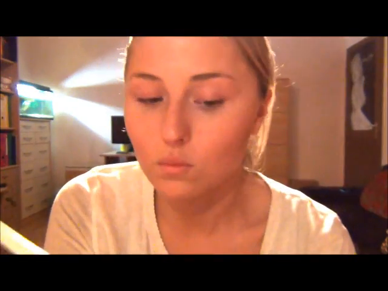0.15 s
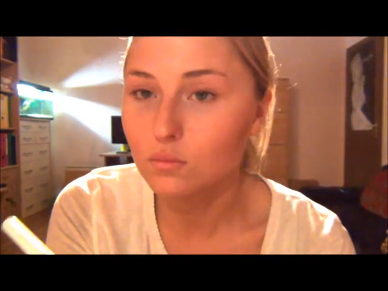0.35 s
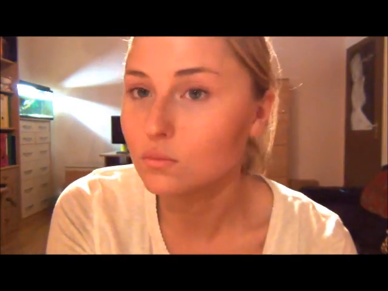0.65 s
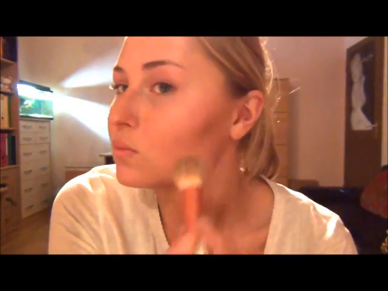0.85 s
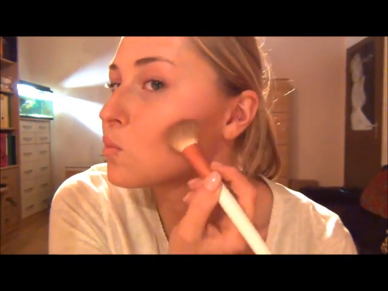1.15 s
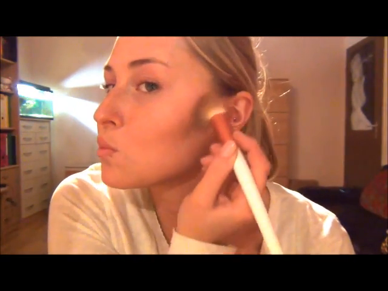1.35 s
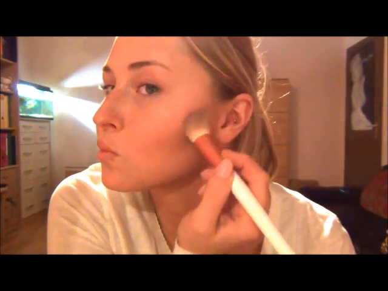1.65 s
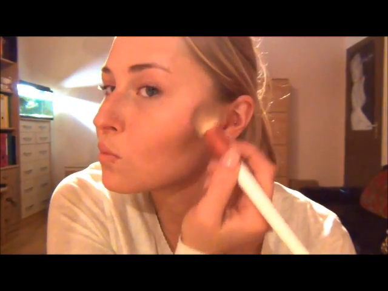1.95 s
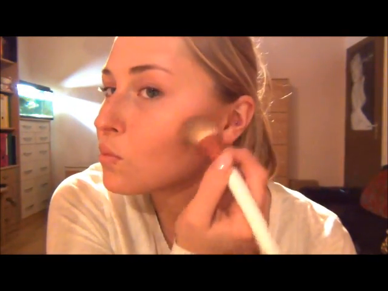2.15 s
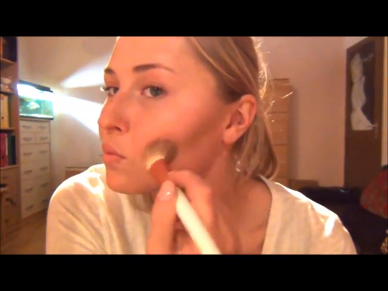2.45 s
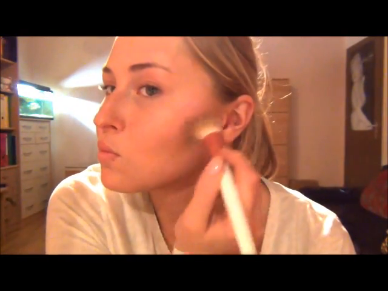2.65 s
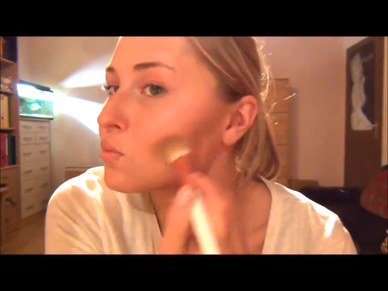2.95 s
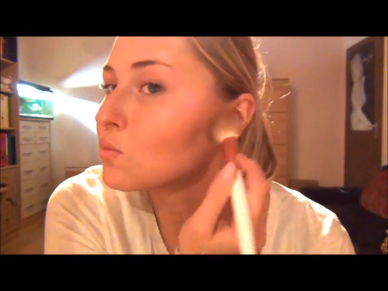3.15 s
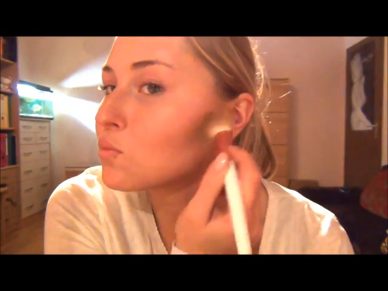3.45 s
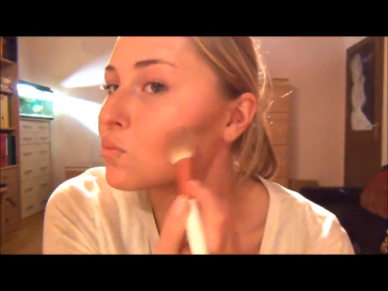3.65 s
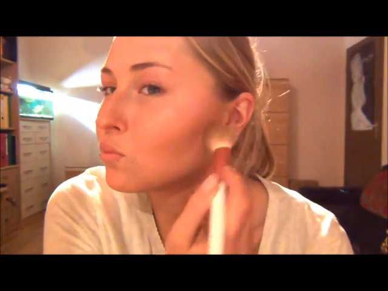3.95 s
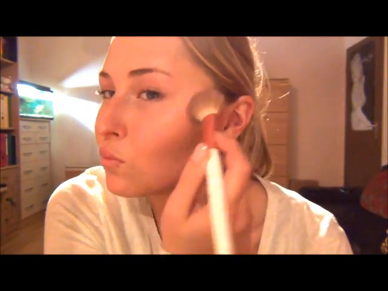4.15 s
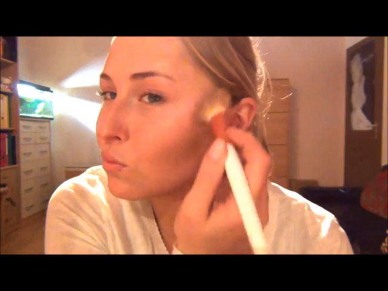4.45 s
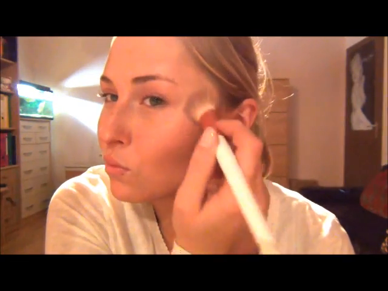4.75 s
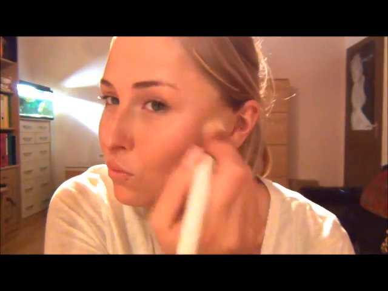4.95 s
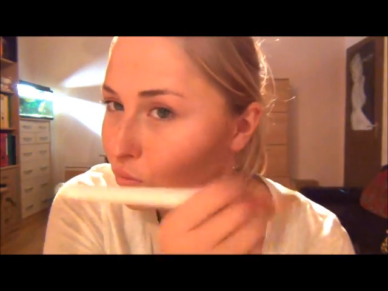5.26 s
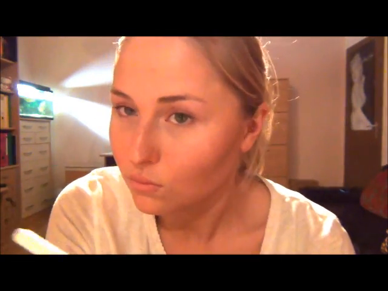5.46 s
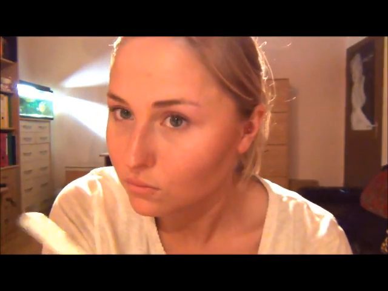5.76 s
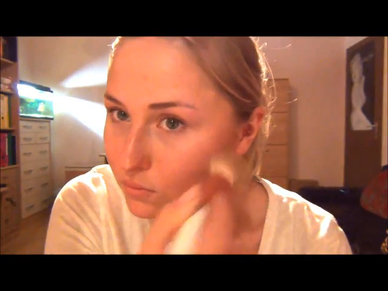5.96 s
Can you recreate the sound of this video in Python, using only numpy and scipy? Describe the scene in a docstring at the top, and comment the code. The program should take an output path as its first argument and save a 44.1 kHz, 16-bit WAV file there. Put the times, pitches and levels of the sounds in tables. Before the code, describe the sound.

A faint computer fan, mains hum and hiss run throughout in a bedroom. Close to the microphone, a makeup brush scrapes in powder at about 0.4, 0.6 and 0.8 seconds, each dab louder, the third with tiny dry ticks and a thin ring from the pan. At 1 second the plastic compact snaps shut, sharp and bright, with a short room echo. This is by far the loudest sound; the background dips after it and creeps back over about three seconds. From 1.4 to 5.5 seconds, slightly farther away, the brush sweeps to and fro over a cheek in soft, airy, uneven strokes, about four a second. At 5.6 seconds bristles tick against the pan's rim, and two close, lightly ringing scrapes follow at 5.7 and 5.9 seconds. One last very faint sweep comes at 6 seconds.

```python
"""A powder brush and its plastic compact, close to a small microphone in a bedroom.
The bristles scrape the powder and set the pan ringing, then the lid snaps shut. A little farther off
the brush sweeps to and fro over a cheek, and at the end it is loaded once more, close up.
A computer fan and mains hum sit behind it. The snap ducks the recorder's automatic gain,
which creeps back over a few seconds."""
import sys
import numpy as np
from scipy import signal
from scipy.fft import rfft, irfft, next_fast_len
from scipy.io import wavfile
from scipy.ndimage import uniform_filter1d

SR = 44100
rng = np.random.default_rng(int(sys.argv[2]) if len(sys.argv) > 2 else 0)


def file_out(sig):
    """Save sig as 16-bit WAV at sys.argv[1]."""
    # one column per channel
    cols = np.atleast_2d(sig).T
    # limit, then scale
    lim = np.clip(cols, -1, 1)
    pcm = np.round(lim * 32767).astype(np.int16)
    wavfile.write(sys.argv[1], SR, pcm)


N = 268549
TIME = np.arange(N) / SR

# spectra of the fan's air and the microphone's own hiss: f/Hz, relative density/dB
FAN_AIR_SPECTRUM = [(20, -20), (35, -7.5), (70, -8), (150, -6), (200, -1.5), (290, -0.5), (370, -4.5),
                    (500, -8), (750, -5.5), (1020, -8.5), (1500, -10.5), (2100, -12), (3500, -21.5),
                    (8000, -24)]
MIC_HISS_SPECTRUM = [(300, -13), (3000, 1.5), (7000, -1), (11000, .5), (15000, -1.5), (16000, -6.5)]
# resonances of the fan and its housing: f/Hz, width/Hz, level/dB
FAN_RESONANCES = [(200.2, 3.6, -64.5), (224.2, 3.7, -63), (254, 10.5, -62.5), (300, 33, -69),
                  (587, 28, -69), (635, 3.3, -72.5), (824.7, 25, -65), (866, 28, -62), (908.4, 19, -63.5),
                  (1253, 73, -66), (1656, 8.1, -73)]
# mains hum and a thin whine with mains sidebands: f/Hz, level/dB
ELECTRICAL_TONES = [(50, -81), (100, -66.5), (15575, -80), (15625, -69.5), (15675, -75)]
# likeness of the background in left and right: f/Hz, correlation
STEREO_CORRELATION = [(60, 0.99), (250, 0.99), (640, 0.79), (1400, 0.67), (3000, 0.44), (7000, 0.68),
                      (15000, 0.86)]
# spectra coming back off the walls, from the brush and from the snap: f/Hz, relative density/dB
BRUSH_ROOM_SPECTRUM = [(100, -10), (500, -1), (2700, 9), (6000, 4), (10000, -2), (15000, -5)]
SNAP_ROOM_SPECTRUM = [(200, -34), (1000, -6), (1900, -3.5), (2700, 2), (3400, -3.5), (4100, 0), (5000, -1),
                      (6100, -6.5), (7000, 2), (7600, 0.5), (8400, -4), (10500, -2.5), (12600, -12),
                      (14000, -16)]
# heavily damped modes of the plastic case: f/Hz, level/dB, t60/s
COMPACT_MODES = [(640, -26, 0.0046), (1370, -26.5, 0.014), (2220, -21, 0.011), (2970, -15, 0.0058),
                 (4090, -17.5, 0.0095), (5040, -18.5, 0.017), (5570, -15.5, 0.0073), (6940, -10, 0.0068),
                 (7580, -13.5, 0.0097), (8530, -16, 0.0092), (9400, -19.5, 0.017), (10600, -21, 0.0067),
                 (11700, -23, 0.0077), (12400, -22.5, 0.018), (14750, -23, 0.0067)]
# the lid shuts and rebounds: t/s, relative level/dB
LID_CONTACTS = [(.9739, 2), (.9861, -1), (.9922, -6.5)]
# stiff bristles flick off the rim of the pan: t/s, relative level/dB
RIM_FLICKS = [(.7562, -19), (.7602, -20), (5.6416, -10.5), (5.6693, -20), (5.6758, -18), (5.6795, -26),
              (5.8853, -26), (5.9046, -19.5)]
# dabs into the compact: deepest point t/s, travel since landing/s, time on the bare pan/s,
# scrape level/dB, relative ring level/dB
POWDER_DABS = [(.38, .035, 0.022, -55, -53), (.577, .074, 0.024, -48, -41),
               (0.759, 0.077, 0.011, -43.5, -27.5), (5.68, 0.088, 0.037, -41.5, -34.5),
               (5.899, 0.082, 0.018, -44.5, -36.5)]
# spectrum of bristles scraping powder: f/Hz, relative density/dB
SCRAPE_SPECTRUM = [(400, -15), (1700, -4.5), (3200, -6), (4400, -4), (5100, 1), (6000, -2), (7000, 0.5),
                   (9000, 0), (10600, 0), (12500, -2.5), (14000, -8), (16000, -2)]
# thin ringing of the powder pan: f/Hz, width/Hz, relative level/dB
PAN_RESONANCES = [(2400, 440, -15), (4860, 87, -5), (7000, 410, -14), (8700, 250, -6), (10470, 330, -2.5),
                  (11900, 4800, -7), (12430, 210, -1), (14400, 300, -3)]
# sweeps over the cheek: top speed t/s, length/s, level/dB, pressure as rub over hiss/dB
CHEEK_SWEEPS = [(1.383, 0.076, -55.5, -4), (1.494, 0.097, -54, -.5), (1.706, .075, -56.5, -6.5),
                (1.893, .06, -55.5, -4.5), (2.096, 0.11, -57, -6), (2.298, 0.045, -56.5, -6.5),
                (2.436, 0.066, -50, -7), (2.705, .09, -59.5, -6.5), (2.8, 0.053, -55.5, -4.5),
                (2.94, 0.068, -57, -7), (3.178, 0.13, -56.5, -4.5), (3.539, 0.076, -52.5, -0.5),
                (3.927, 0.071, -54.5, 1), (4.358, 0.045, -52, -7.5), (4.649, 0.044, -51.5, -8),
                (4.94, 0.053, -54.5, -6), (5.252, .046, -51.5, -4.5), (5.492, 0.078, -52, -12),
                (6.037, 0.048, -60.5, -3)]
# spectra of the hair tips and of the body of the brush on skin: f/Hz, relative density/dB
TIP_SPECTRUM = [(2500, -28), (7000, -11), (8500, -8), (10000, -0.5), (11500, 1.5), (12700, -2.5),
                (14000, -7), (16000, -11.5)]
RUB_SPECTRUM = [(500, -19), (1300, -7.5), (2000, -5.5), (2600, -11), (3300, -0.5), (4400, -2), (5300, -8.5),
                (6300, -4.5), (7600, -20), (12000, -38)]


def from_db(db):
    """Decibels to gain."""
    return 10 ** (np.asarray(db) / 20)


def unit_rms(x):
    """Scale to rms 1."""
    return x / np.sqrt(np.mean(x ** 2) + 1e-20)


def at_hz(points, hz):
    """Read a table on a log-frequency axis."""
    table_hz, values = np.array(points).T
    return np.interp(np.log(np.maximum(hz, 1)), np.log(table_hz), values)


def coloured(x, spectrum):
    """Give a noise a spectrum, at rms 1."""
    size = next_fast_len(x.shape[-1])
    gain = from_db(at_hz(spectrum, np.fft.rfftfreq(size, 1 / SR)))
    return unit_rms(irfft(rfft(x, size) * gain, size)[..., :x.shape[-1]])


def pole_pair(hz, width_hz):
    """Feedback coefficients of one damped resonance."""
    r = np.exp(-np.pi * width_hz / SR)
    return [1, -2 * r * np.cos(2 * np.pi * hz / SR), r * r]


def resonate(x, hz, width_hz):
    """Two-pole resonance with gain 1 at its peak."""
    poles = pole_pair(hz, width_hz)
    return signal.lfilter(np.array([1, 0, -1]) * (1 - poles[2]) / 2, poles, x)


def clicks(rows):
    """One impulse for each row of t/s, level/dB."""
    impulses = np.zeros(N)
    for s, level_db in rows:
        impulses[round(s * SR)] += from_db(level_db)
    return impulses + 1e-18


def panned(x, left_db, late_s=0.0):
    """Place a source at the microphone by the level and delay of left against right."""
    size = next_fast_len(N)
    delay = np.exp(-2j * np.pi * np.fft.rfftfreq(size, 1 / SR) * late_s)
    left = irfft(rfft(x, size) * delay, size)[:N]
    return np.array([left, x]) * from_db(np.array([[left_db], [-left_db]]) / 2)


def spread(pair):
    """Two unrelated noises become left and right: alike in the bass, less so higher up."""
    size = next_fast_len(N)
    alike = np.clip(at_hz(STEREO_CORRELATION, np.fft.rfftfreq(size, 1 / SR)), 0, 1)
    width = np.sqrt((1 - alike) / (1 + alike))
    mid, side = rfft(pair, size)
    return irfft(mid + width * side * [[1], [-1]], size)[:, :N]


def room_tone(air_db=-56.0, hiss_db=-58.5):
    """At the back, fan air excites its housing, over electrical tones and microphone hiss."""
    air = from_db(air_db) * coloured(rng.standard_normal((2, N)), FAN_AIR_SPECTRUM)
    turbulence = rng.standard_normal((2, N))
    housing = sum((-1) ** k * from_db(db) * unit_rms(resonate(turbulence, hz, width))
                  for k, (hz, width, db) in enumerate(FAN_RESONANCES))
    hiss = from_db(hiss_db) * coloured(rng.standard_normal((2, N)), MIC_HISS_SPECTRUM)
    tones = sum(np.sqrt(2) * from_db(db) * np.sin(2 * np.pi * (hz * TIME + rng.random()))
                for hz, db in ELECTRICAL_TONES)
    return spread(air + housing + hiss) + tones


def bedroom(x, wet_db, colour, t60=0.39, treble_t60=0.27, split_hz=8500, build_s=0.0017):
    """The walls return a short, dense reverberation, fairly narrow in stereo; its treble dies first."""
    t = TIME[:SR // 2]
    mid, side = coloured(rng.standard_normal((2, len(t))), colour)
    walls = mid + 0.46 * side * np.array([[1], [-1]])
    low, high = (signal.sosfilt(signal.butter(4, split_hz, kind, fs=SR, output="sos"), walls)
                 for kind in ("low", "high"))
    echo = low * 1000 ** (-t / t60) + high * 1000 ** (-t / treble_t60)
    echo *= 1 - np.exp(-t / build_s)
    echo /= np.sqrt(np.sum(echo ** 2) / 2)
    return from_db(wet_db) * signal.fftconvolve(x[None], echo, axes=1)[:, :N]


def plastic_case(force):
    """The struck compact rings briefly in its damped modes."""
    ring = np.zeros(N)
    for k, (hz, level_db, t60) in enumerate(COMPACT_MODES):
        r, w = from_db(-60 / (t60 * SR)), 2 * np.pi * hz / SR
        mode = signal.lfilter([0, np.sin(w)], [1, -2 * r * np.cos(w), r * r], force)
        ring += (-1) ** k * from_db(level_db) * mode
    return ring


def lid_snap(bend_hz=7000, bend_width_hz=4200):
    """Close up, bending waves in the plastic disperse and smear each contact over a millisecond as the case
    rings."""
    poles = pole_pair(bend_hz, bend_width_hz)
    force = clicks(LID_CONTACTS)
    for _ in range(3):
        force = signal.lfilter(poles[::-1], poles, force)   # all-pass
    return plastic_case(force)


def swell(s, rise_s, fall_s, level_db):
    """Brush speed rises smoothly to its top at time s and falls again."""
    from_top = (TIME - s) / np.where(TIME < s, rise_s, fall_s)
    return from_db(level_db) * np.exp(-np.minimum(from_top ** 2, 50) / 2)


def together(envelopes):
    """Overlapping strokes add in power."""
    return np.sqrt(sum(e ** 2 for e in envelopes))


def bristles(per_s, size_db):
    """Countless hairs catch and slip, each a tiny impulse; size_db scatters their sizes."""
    sizes = from_db(size_db * np.minimum(rng.exponential(1, N), 4))
    signs = rng.choice([-1, 1], N)
    slipping = rng.random(N) < per_s / SR
    return unit_rms(sizes * signs * slipping)


def rim_flicks(low_cut_hz=3200, tick_db=4.0):
    """A bristle released from the rim gives a bright, dry tick."""
    low_cut = signal.butter(2, low_cut_hz, "high", fs=SR, output="sos")
    return from_db(tick_db) * signal.sosfilt(low_cut, clicks(RIM_FLICKS))


def flutter(per_s, depth_db=2.5):
    """A gain that wavers at random, gliding to a new value per_s times a second."""
    knots = rng.standard_normal(N // 10)
    return from_db(depth_db * np.interp(TIME * per_s, np.arange(len(knots)), knots))


def powder_dabs(landing_s=0.0088, lead_s=0.01, lift_s=0.018, ring_db=-1.5):
    """Close up, bristles land and scrape over the powder; where they reach the bare pan it rings."""
    on_powder, on_pan = [], []
    for s, travel_s, contact_s, scrape_db, pan_db in POWDER_DABS:
        landing_db = -31 + 0.39 * scrape_db   # a soft brushing, a little louder before a hard scrape
        on_powder.append(swell(s - travel_s, landing_s, landing_s, landing_db))
        # the scrape peaks just before the deepest point and ends as the brush lifts
        on_powder.append(swell(s - lead_s, 0.45 * travel_s, lift_s, scrape_db))
        on_pan.append(swell(s, 0.55 * contact_s, 0.45 * contact_s, pan_db))
    slips = bristles(per_s=9000, size_db=1.0) * flutter(per_s=440)
    scrape = together(on_powder) * coloured(slips, SCRAPE_SPECTRUM)
    pan = sum(from_db(db) * resonate(slips, hz, width) for hz, width, db in PAN_RESONANCES)
    return scrape + from_db(ring_db) * together(on_pan) * unit_rms(pan)


def cheek_sweeps(rise_share=0.44, rub_lag_s=0.0026):
    """Hair tips hiss on the skin; the body of the brush follows with a lower rub, louder if pressed."""
    speed, pressed = [], []
    for s, length_s, level_db, pressure_db in CHEEK_SWEEPS:
        rise_s = rise_share * length_s
        speed.append(swell(s, rise_s, length_s - rise_s, level_db))
        pressed.append(swell(s + rub_lag_s, rise_s, length_s - rise_s, level_db + pressure_db))
    tips = together(speed) * coloured(bristles(per_s=16000, size_db=3.0), TIP_SPECTRUM)
    rub = together(pressed) * coloured(bristles(per_s=15000, size_db=0.0), RUB_SPECTRUM)
    return (tips + rub) * flutter(per_s=70)


def scene():
    """Brush and compact near the microphone, just right of centre, with the bedroom around them."""
    loading = powder_dabs() + rim_flicks()
    cheek = cheek_sweeps()
    snap = panned(lid_snap(), left_db=-1.0, late_s=7e-6)
    brush = panned(loading, left_db=-1.3, late_s=5e-6) + panned(cheek, left_db=-0.5)
    # the walls get what the case radiates in all directions, a smoother spectrum than the direct snap
    snap_room = bedroom(clicks(LID_CONTACTS), wet_db=-2.5, colour=SNAP_ROOM_SPECTRUM)
    # the cheek is farther from the microphone, so wetter
    brush_room = bedroom(loading + from_db(2.5) * cheek, wet_db=-16.5, colour=BRUSH_ROOM_SPECTRUM)
    return snap + brush + snap_room + brush_room + room_tone()


def automatic_gain(x, threshold_db=-31.0, most_cut_db=7.0, recovery_s=2.93, attack_s=0.026):
    """A loud sound charges the detector and ducks the gain; the charge drains at a steady rate."""
    power = uniform_filter1d(np.mean(x ** 2, axis=0), SR // 50)
    level = np.sqrt(np.maximum(power, 0))
    full = from_db(most_cut_db) - 1
    charge = np.clip((level / from_db(threshold_db)) ** 4 - 2, 0, full)
    drain = full * TIME / recovery_s
    held = np.maximum.accumulate(charge + drain) - drain
    r = np.exp(-1 / (attack_s * SR))
    return x / (1 + signal.lfilter([1 - r], [1, -r], held))


def record(dry, cutoff_hz=15800):
    """The recorder rides the gain, then cuts the top steeply."""
    high_cut = signal.ellip(12, .1, 80, cutoff_hz, fs=SR, output="sos")
    return signal.sosfilt(high_cut, automatic_gain(dry))


dry = scene()
out = record(dry)
file_out(out)
```